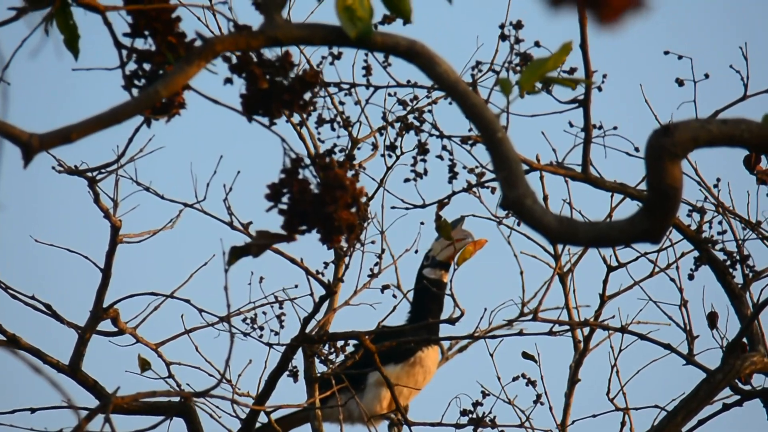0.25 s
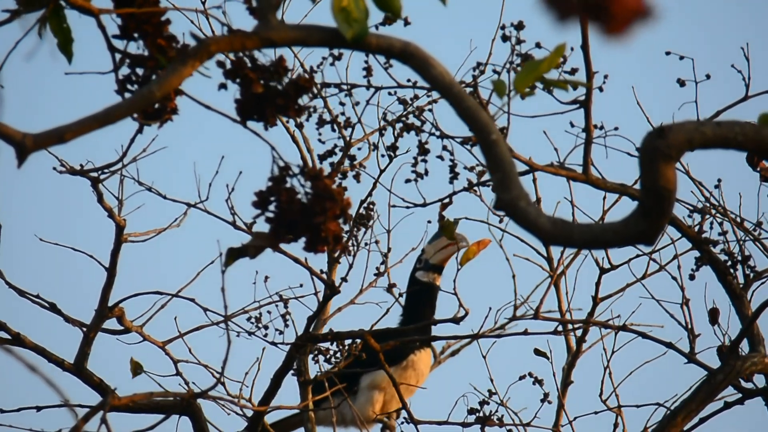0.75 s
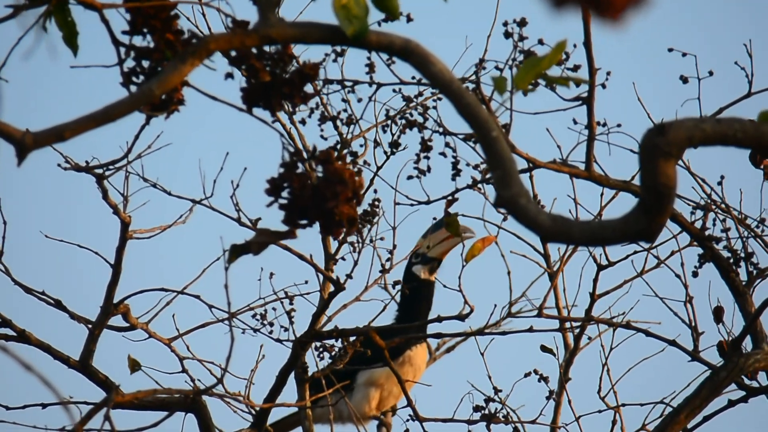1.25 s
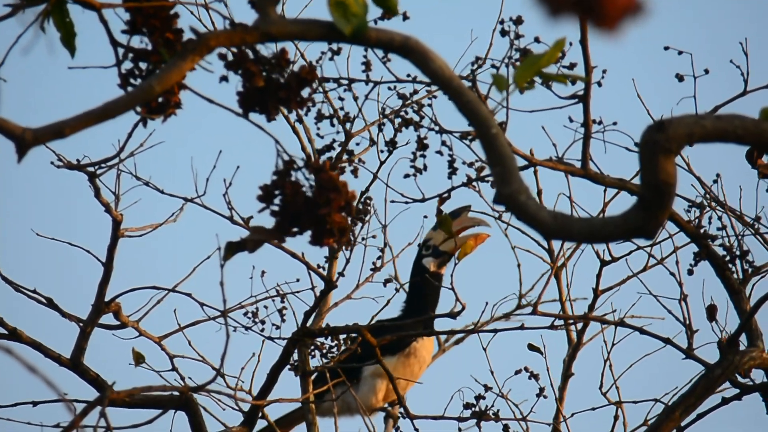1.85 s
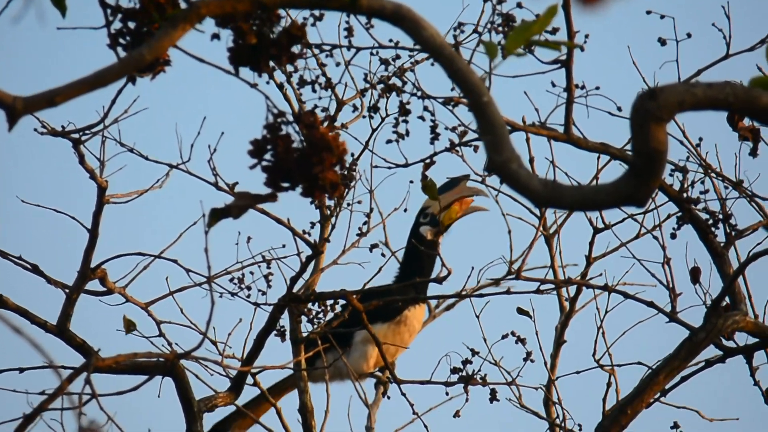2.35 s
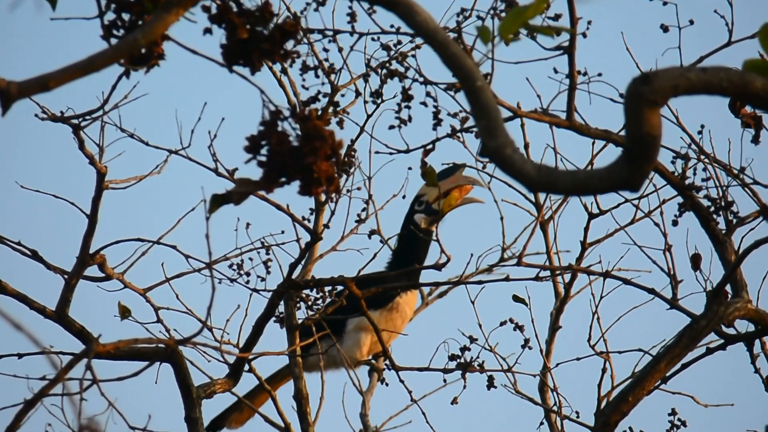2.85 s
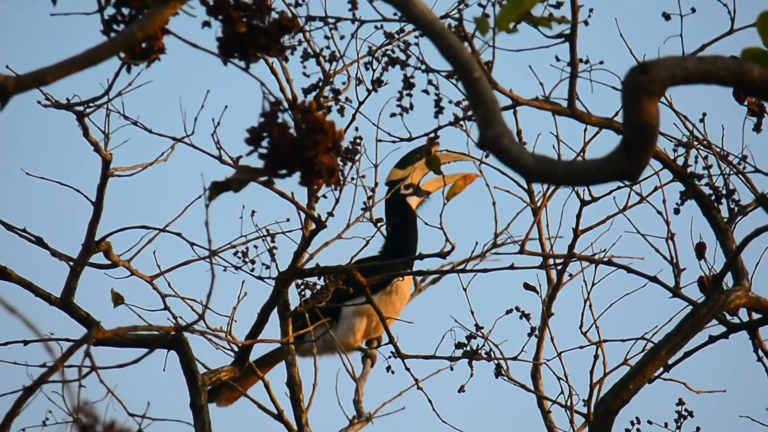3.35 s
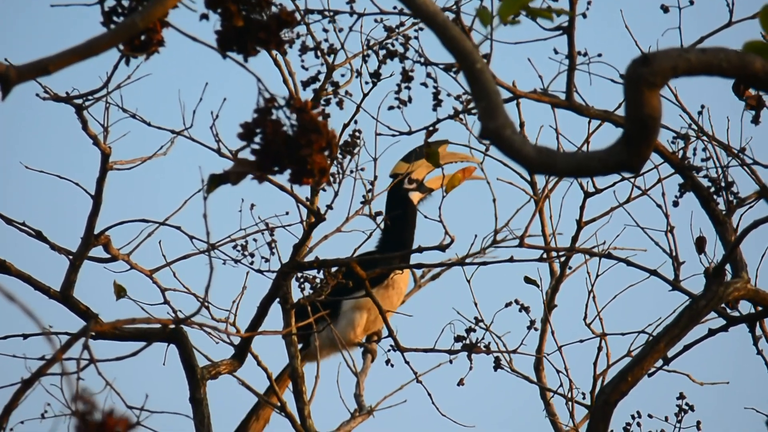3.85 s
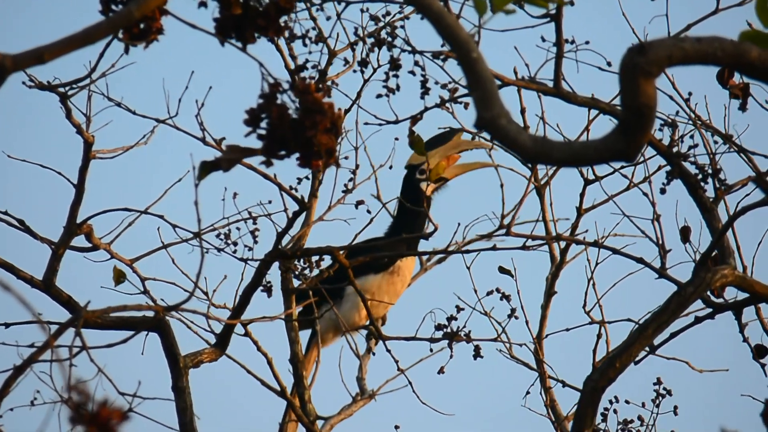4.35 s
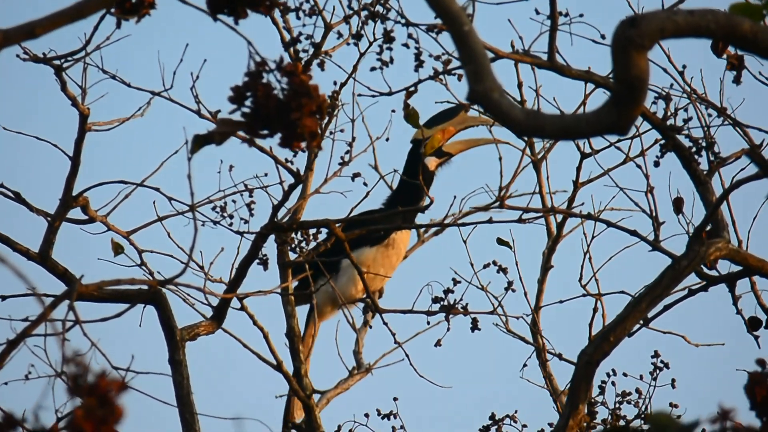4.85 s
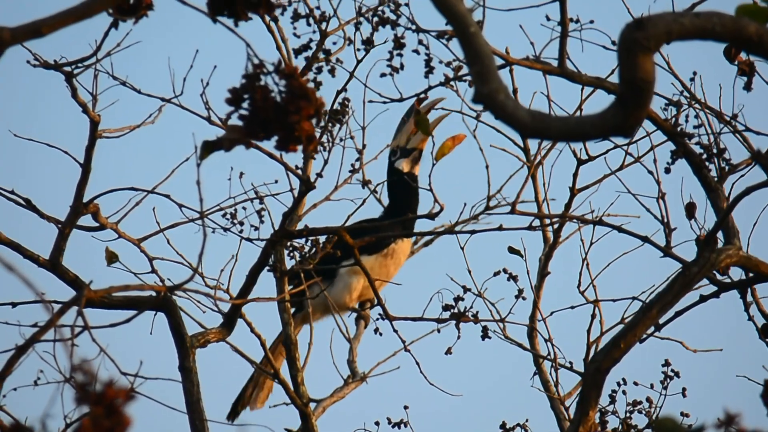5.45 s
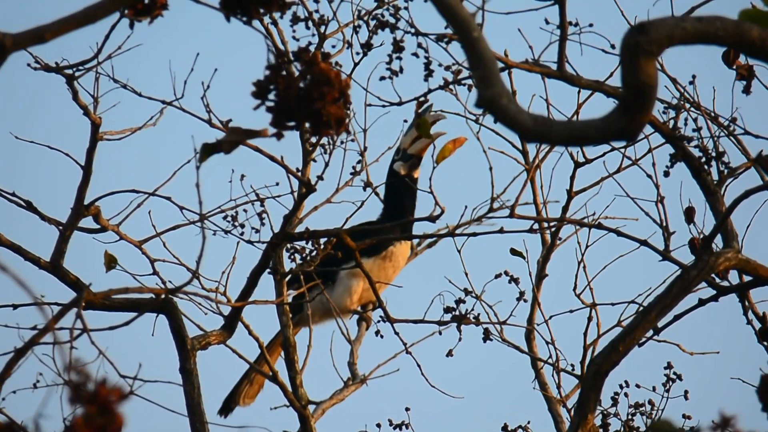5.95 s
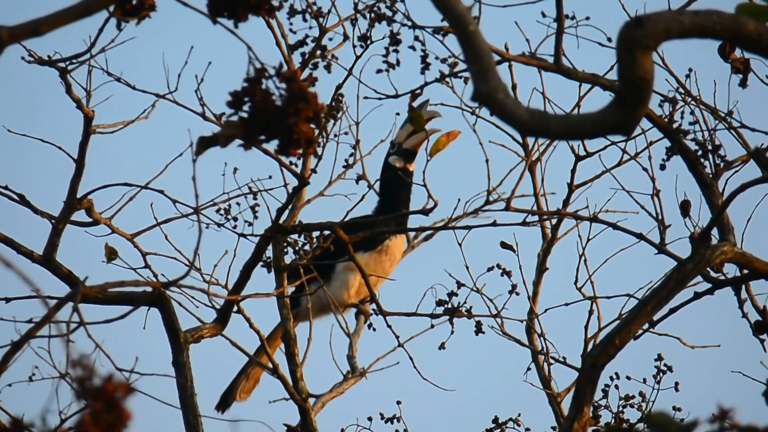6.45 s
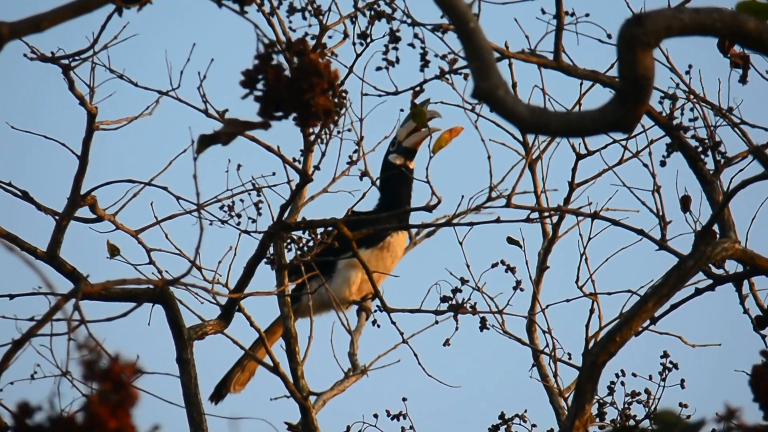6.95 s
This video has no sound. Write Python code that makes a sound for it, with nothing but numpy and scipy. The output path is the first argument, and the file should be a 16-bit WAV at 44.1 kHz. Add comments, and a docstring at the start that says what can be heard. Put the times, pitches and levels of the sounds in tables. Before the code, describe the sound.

A quiet, wide woodland hush with a faint, steady, high insect hiss. From 0 to about 1 second a large bird, nearly straight ahead, gives six soft, hollow clucks about 0.2 seconds apart; leaves rustle very faintly near 0.55. At 1.2 comes a short, weak, low squawk, then from 1.5 to 6.1 ten loud, harsh squeals, roughly one every half second, each about a quarter second long. Each leaps up in pitch, holds a bright, nasal, double-voiced scream with a gritty edge, then drops off. Between squeals, thin, much quieter whistles sound as the bird draws breath. The middle calls are rougher; the last, near 5.9, is broken and cracks upward. Trees add a short, diffuse echo. Soft low wind bumps touch the microphones, slightly stronger on the right. At 6.6 leaves rustle briefly, and the hush continues to about 7 seconds.

```python
"""A large bird in a treetop, nearly straight ahead of a pair of microphones, first clucks softly.
Then comes a run of harsh squeals with a thin whistle on each indrawn breath. Two membranes in its voice box
vibrate at once and mix; throat and hollow bill colour them. Trees echo the calls. A quiet woodland hush, a thin
insect band and soft wind thumps lie beneath; leaves rustle during the clucks and again after the last squeal."""
import sys
import numpy as np
from scipy import signal
from scipy.fft import rfft, irfft, next_fast_len
from scipy.io import wavfile
from scipy.ndimage import uniform_filter1d

SR = 44100
rng = np.random.default_rng(int(sys.argv[2]) if len(sys.argv) > 2 else 0)


def wav_out(sig):
    """Save sig, one row per channel (or a flat mono array), as 16-bit PCM at SR to the path in sys.argv[1]."""
    wavfile.write(sys.argv[1], SR, np.round(np.clip(np.atleast_2d(sig).T, -1, 1) * 32767).astype(np.int16))


def to_linear_factor(level_db):
    """Convert decibel levels (scalar or array-like) to linear amplitude factors."""
    exponent = np.asarray(level_db, float) / 20
    return 10 ** exponent


N = 317520


def colour(x, points):
    """Shape a signal's spectrum by (Hz, dB) points."""
    hz, db = np.transpose(points)
    size = next_fast_len(x.shape[-1])
    bins = np.maximum(np.arange(size // 2 + 1) * SR / size, 1)
    gain = to_linear_factor(np.interp(np.log(bins), np.log(hz), db))
    return irfft(rfft(x, size) * gain, size)[..., :x.shape[-1]]


def level(x, db):
    """Set the rms level."""
    return x * to_linear_factor(db) / np.sqrt(np.mean(x ** 2))


def walk(rate, count):
    """Smooth random wobble of rms 1; a higher rate [Hz] wobbles faster."""
    k = int(SR / rate)
    smooth = uniform_filter1d(uniform_filter1d(rng.standard_normal(count), k), k)
    return level(smooth, 0)


def add(track, start_s, sound):
    """Mix a sound in at a time."""
    i = max(int(start_s * SR), 0)
    track[..., i:i + sound.shape[-1]] += sound[..., :N - i]


def unroll(rows):
    """Curve rows to one value a sample, with a short fade at both ends."""
    s, *columns = np.transpose(rows)
    t = np.arange(s[0], s[-1], 1 / SR)
    fade = np.clip(np.minimum((t - s[0]) / 0.0022, (s[-1] - t) / 0.0091), 0, 1)
    return fade, [np.interp(t, s, c) for c in columns]


def throat(hz, gape_db):
    """Gain of the steep throat resonances for one gape; little bass leaves the bill, a trace the chest."""
    # throat and bill resonances: (centre [Hz], width [Hz], level before the gape's lift [dB])
    resonances = [(1270, 760, -5.5), (1650, 790, -2), (2075, 196, 2.5), (2580, 880, 4), (3090, 270, -2.5),
                  (3900, 1010, -5.5), (4663, 264, 3.5), (5570, 1280, -6.5), (6692, 430, -7.5),
                  (7920, 1500, -17), (9110, 1130, -13), (10070, 1900, -17.5), (12260, 4000, -24.5)]
    # where the lifts in gape_db apply: (frequency [Hz])
    gape_hz = [1300, 2300, 3300, 3900, 4700, 5600, 6600, 7600, 9000, 10500, 13000]
    bill_low_hz, bill_high_hz = 1000, 11440
    chest_hz, chest_width_hz, chest_db = 536, 220, -10.5
    lift_db = np.interp(np.log([row[0] for row in resonances]), np.log(gape_hz), gape_db)
    power = 0
    for (centre, width, db), lift in zip(resonances, lift_db):
        power = power + to_linear_factor(2 * (db + lift)) / (1 + (2 * (hz - centre) / width) ** 2) ** 2
    bill = 1 / (1 + (bill_low_hz / hz) ** 18)
    chest = to_linear_factor(2 * chest_db) / (1 + (2 * (hz - chest_hz) / chest_width_hz) ** 4)
    return np.sqrt(power * (bill + chest) / (1 + (hz / bill_high_hz) ** 16))


def controls(start_s, end_s, climb_db, higher_db, fall_db, hold):
    """A squeal's climb, hold and fall, as the membranes tighten from slack pitch and loosen again.

    Rows of (time [s], low [Hz], high [Hz], level, mixed, higher mixed, brightness [dB], roughness)."""
    rest_hz, climb_s = 501.7, 0.028  # slack pitch; time constant of the climb
    swell_s, swell_db = 0.0048, -25  # the level swells in from this far below the climb
    dip_s, dip_width_s, dip_db = 0.026, 0.0054, -2.5  # the voice falters just after it catches
    climb_mixed_db, climb_higher_db, climb_rough, climb_dull_db = -7.5, -20, 0.426, -21
    fall_low_hz, fall_high_hz, fall_mixed_db, fall_rough, fall_dull_db = 902, 1405, -10, 0.39, -8.5
    fall_start_higher_db, fall_end_higher_db = 6, -8

    top_s, top_hz, top_high_hz, top_db, _, top_bright_db, top_rough = hold[0]
    t = np.arange(0, top_s - start_s - .004, .004)
    part, same = t / (top_s - start_s), np.ones(len(t))
    risen = (1 - np.exp(-t / climb_s)) / (1 - np.exp(-(top_s - start_s) / climb_s))
    low_hz = rest_hz + (top_hz - rest_hz) * risen
    high_hz = low_hz * top_high_hz / top_hz
    db = climb_db + swell_db * np.exp(-t / swell_s) + (top_db - climb_db) * part ** 3.1
    db = db + dip_db * np.exp(-((t - dip_s) / dip_width_s) ** 2)
    bright_db = top_bright_db + climb_dull_db * (1 - risen)
    # roughness moves to its top value mostly just before the top
    rough = climb_rough + (top_rough - climb_rough) * part ** 2.3
    climb = np.c_[start_s + t, low_hz, high_hz, db, climb_mixed_db * same, climb_higher_db * same,
                  bright_db, rough]

    higher = [climb_higher_db] + [higher_db] * (len(hold) - 2) + [fall_start_higher_db]
    held = [(*row[:5], step_db, *row[5:]) for row, step_db in zip(hold, higher)]

    _, last_hz, last_high_hz, last_db, _, last_bright_db, _ = hold[-1]
    fall = (end_s, min(fall_low_hz, last_hz), min(fall_high_hz, last_high_hz), last_db + fall_db,
            fall_mixed_db, fall_end_higher_db, last_bright_db + fall_dull_db, fall_rough)
    return np.vstack([climb, held, fall])


def squeal(rows, gape_db):
    """Every tone is j low + k high membrane cycles; the high membrane is the unsteady one."""
    grid_hz = np.linspace(1, SR / 2, 1024)
    bright_hz = 3190  # brightness balances the sound below and above this
    fade, (low_hz, high_hz, db, mixed_db, higher_db, bright_db, rough) = unroll(rows)
    # fast pitch glides shake the membranes out of step
    rough = rough + np.clip(np.abs(np.gradient(low_hz)) * SR / 90000, 0, .2)
    rough = np.clip(rough, 0, 1)
    n, gain = len(fade), throat(grid_hz, gape_db)
    low = np.cumsum(low_hz * (1 + 0.0262 * rough * walk(670, n))) * 2 * np.pi / SR
    high = np.cumsum(high_hz * (1 + 0.1218 * rough * walk(307, n))) * 2 * np.pi / SR

    bands, powers = np.zeros((2, n)), np.zeros((2, n))  # below and above bright_hz
    for j in range(-2, 11):
        for k in range(-1, 4):
            hz = np.abs(j * low_hz + k * high_hz)
            if j + k < 0 or hz.max() < 200 or hz.max() > .45 * SR:
                continue
            # tones with cycles of the high membrane follow the mixed and higher mixed levels
            mix_db = 0
            if k != 0:
                mix_db = mixed_db + abs(k - 1) ** 0.28 * np.minimum(higher_db, 2) - 1.4 * (k < 0)
            size = to_linear_factor(mix_db - 0.96 * abs(j) - 5.7 * (j < 0)) * np.interp(hz, grid_hz, gain)
            upper = 1 / (1 + (bright_hz / (hz + 1)) ** 12)
            split = np.array([1 - upper, upper])
            bands += split * size * np.cos(j * low + k * high + 0.784 * j * j)
            powers += (split * size) ** 2 / 2

    # turbulent air puffs once a cycle through the same throat
    puffs = rng.standard_normal(n) * (1 + 3.7 * np.cos(low))
    air = colour(puffs, np.c_[grid_hz, 20 * np.log10(gain)])
    air = colour(air, [(1000, -26), (1700, -5)])
    air_upper = colour(air, [(bright_hz * 0.87, -30), (bright_hz * 1.22, 0)])
    airs = np.array([level(air - air_upper, 0), level(air_upper, 0)])
    share = np.clip(np.array([rough, 1.35 * rough + .07]), 0, .9)  # the treble is breathier
    flutter = to_linear_factor(5 * rough * walk(700, n))
    voiced = np.sqrt(1 - share ** 2) * bands / np.sqrt(powers) * flutter + share * airs

    treble = np.clip(to_linear_factor(bright_db), 0, .95)
    balanced = np.sqrt(1 - treble ** 2) * voiced[0] + treble * voiced[1]
    # the membranes catch at once, so the opening jumps up faster than the effort
    catch = 1 + 0.5 * np.exp(-((np.arange(n) / SR - .005) / 0.0097) ** 2)
    return fade * catch * to_linear_factor(db) * balanced


def flare(db, hz):
    """A brief rising chirp: the second partial strikes the bill resonance."""
    t = np.arange(int(0.017 * SR)) / SR
    return to_linear_factor(db) * np.hanning(len(t)) * np.sin(2 * np.pi * hz * t * (1 + 2.6 * t))


def breath(start_s, loud_s, end_s, top_hz, top, first_db, second_db):
    """An indrawn breath as rows of (s, Hz, first dB, second dB): soft at first, a jump, an arch, a fade."""
    rest_hz, jump_s = 770, 0.0147
    soft_arch, jump_share, bend = 0.299, .85, 2.2  # shares of the rise above rest; power of the sag
    soft_db, end_db = -9, -15.5
    kick_db, kick_share = 2.5, 0.1  # extra level at the jump, dying over this share of the loud part
    pure_db, thin_db = -1, -7.5  # change in the overtones while soft, and by the end
    u = np.arange(9) / 8
    rise = 1 - (1 - jump_share) * np.clip(1 - u / top, 0, 1) ** 2
    sag = np.clip((u - top) / (1 - top), 0, 1) ** bend
    s = np.r_[start_s, max(loud_s - jump_s, start_s), loud_s + u * (end_s - loud_s)]
    arch = np.r_[0, soft_arch, rise - sag]
    db = np.r_[soft_db, soft_db, end_db * u ** 3.2 + kick_db * np.exp(-u / kick_share)]
    overtone_db = np.r_[pure_db, pure_db, thin_db * u]
    return np.c_[s, rest_hz + (top_hz - rest_hz) * arch, first_db + db, second_db + db + overtone_db]


def inhale(rows):
    """One membrane whistles nearly clean on the indrawn air."""
    fade, (hz, first_db, second_db) = unroll(rows)
    phase = np.cumsum(hz * (1 + .005 * walk(150, len(hz)))) * 2 * np.pi / SR
    overtones = np.sin(2 * phase) + to_linear_factor(-11) * np.sin(3 * phase)
    tones = to_linear_factor(first_db) * np.sin(phase) + to_linear_factor(second_db) * overtones
    return np.sqrt(2) * fade * tones * to_linear_factor(2.1 * walk(39, len(hz)))


def cluck(db, hz):
    """A short closed-bill note: second (at hz) and third partials of a low pitch that sags."""
    t = np.arange(int(0.028 * SR)) / SR
    phase = np.pi * hz * t * (1 - 0.6 * t)
    return to_linear_factor(db) * np.hanning(len(t)) * (np.sin(2 * phase) + to_linear_factor(-5.5) * np.sin(3 * phase))


def bird():
    """All that the bird utters: squeals with flares, whistled breaths and clucks, from one throat."""
    # squeals: (start [s], end [s], level as the pitch climbs [dB], higher mixed tones [dB],
    # change in level at the end [dB])
    squeals = [(1.201, 1.282, -37, -14, -4), (1.472, 1.732, -27, -5.5, -7),
               (2.015, 2.293, -26, -13.5, -6.5), (2.507, 2.754, -25.5, 1, -4), (2.96, 3.202, -24.5, -9, -5),
               (3.448, 3.74, -31, -9.5, -1.5), (3.954, 4.22, -28.5, -4.5, -4.5),
               (4.468, 4.72, -28, -0.8, -3), (4.926, 5.157, -28, -1, -4), (5.359, 5.609, -26, -0.3, -5),
               (5.878, 6.087, -25.5, -5, -2)]
    # each squeal from the top of its climb to the start of its fall: (time [s], low membrane [Hz],
    # high membrane [Hz], level [dB], mixed tones [dB], brightness [dB], roughness before glides add to it [0-1])
    holds = [
        [(1.21, 470, 778, -37.5, -25, -18, 0.4), (1.225, 528, 764, -34, -36, -8, 0.56),
         (1.24, 517.3, 777, -31, -4, -7, 0.65), (1.26, 490.5, 770, -36, -23, -8, 0.68)],
        [(1.52, 1300, 1877, -25.5, -17, -1.5, 0.04), (1.53, 1203, 1945, -23, 0, -6, 0.4),
         (1.56, 1235, 1995, -20.5, 1, -6, 0.22), (1.63, 1264, 2050, -18, 1.5, -5.5, 0),
         (1.68, 1237, 1981, -21.5, 3, -8, .26), (1.7, 1016, 1676, -26.5, -2, -7.5, 0.4)],
        [(2.058, 1312, 1614, -24, -21, -2, .01), (2.066, 1197, 1635, -22, 1, -7.5, 0.27),
         (2.095, 1281, 1746, -22, -12, -3.5, 0.18), (2.105, 1270, 1938, -18.5, 6, -8.5, .19),
         (2.16, 1262, 2057, -14.5, 4, -6, .05), (2.22, 1274, 2002, -16.5, 7.5, -6, 0.13),
         (2.25, 1206, 1708, -25.5, 0, -3, 0.2)],
        [(2.566, 1278, 2032, -23, -34, -0.5, 0.01), (2.574, 1215, 1956, -20.5, 1, -6.5, 0.4),
         (2.61, 1254, 2085, -21, -4, -4.5, 0.15), (2.65, 1264, 2194, -21, -12, -2.5, 0.19),
         (2.69, 1254, 2090, -21.5, -6.5, -4, 0.22), (2.715, 1200, 1981, -23, 8, -5, 0.32),
         (2.735, 1000, 1690, -31.5, -17, -6, 0.42)],
        [(3.008, 1358, 2142, -24, -34, -2, 0.04), (3.018, 1272, 2137, -21, -3, -6, 0.45),
         (3.06, 1292, 2243, -21.5, -8, -4, 0.27), (3.07, 1298, 1960, -18, 6, -4, 0.12),
         (3.11, 1292, 2054, -16.5, 2, -5.5, .18), (3.145, 1282, 1946, -18.5, 0.5, -5.5, 0.09),
         (3.17, 1244, 1850, -25.5, 1, -3.5, 0.36)],
        [(3.48, 1267, 1603, -26.5, -27, -7.5, 0), (3.49, 1212, 1650, -25.5, -4, -14, 0.45),
         (3.51, 1253, 1828, -28.5, -3, -7, 0.22), (3.545, 1272, 2064, -20, 3.5, -14, 0.17),
         (3.59, 1282, 2141, -21.5, -2, -6, 0.06), (3.665, 1265, 2068, -21.5, 3.5, -11.5, 0.18),
         (3.695, 1224, 1750, -30, -15, -5, 0.4)],
        [(4.005, 1289, 1600, -29.5, -11, -6.5, 0.2), (4.015, 1277, 1600, -25.5, -9, -11, 0.34),
         (4.05, 1232, 1669, -24, -4, -10, .32), (4.082, 1279, 1750, -23, -9, -9, .27),
         (4.092, 1286, 1949, -21.5, 2.5, -10, 0.03), (4.16, 1286, 1910, -21.5, 6, -10, 0.16),
         (4.185, 1244, 1804, -28.5, -6, -5.5, 0.34)],
        [(4.522, 1266, 1575, -30, -12, -3.5, .12), (4.53, 1240, 1582, -24.5, -4, -7, 0.54),
         (4.56, 1214, 1602, -25.5, -5, -5.5, 0.43), (4.6, 1216, 1625, -24.5, -3, -5, 0.19),
         (4.65, 1203, 1635, -23.5, -6, -6, 0.4), (4.68, 1165, 1522, -29, -6, -5, 0.42)],
        [(4.985, 1216, 1570, -27.5, -29, -6, 0.24), (5.033, 1299, 1547, -22.5, -23, -12.5, 0.17),
         (5.04, 1206, 1572, -25, 2, -6.5, 0.53), (5.07, 1212, 1606, -24, -4.5, -7.5, 0.31),
         (5.1, 1198, 1614, -25, 5, -4, 0.08), (5.115, 1280, 1578, -28, -4, -5.5, 0.15),
         (5.135, 1059, 1460, -27.5, -9, -9.5, 0.67)],
        [(5.407, 1320, 1601, -26.5, -4, -3, 0.25), (5.414, 1200, 1615, -22.5, -5, -10.5, 0.38),
         (5.45, 1229, 1665, -21.5, -4.5, -5.5, 0.16), (5.51, 1256, 1708, -19, -7.5, -3.5, 0.06),
         (5.555, 1243, 1709, -20, -3.5, -7, 0.08), (5.575, 1190, 1565, -23.5, -3, -4.5, 0.3),
         (5.595, 1141, 1500, -28, -10, -11, .5)],
        [(5.938, 1050, 1606, -22.5, -8, -3.5, 0.7), (5.945, 1108, 1650, -26.5, -26, -1, 0),
         (5.984, 1096, 1631, -28.5, -23, -1.5, 0), (5.99, 1041, 1606, -25.5, -19, -2.5, 0.33),
         (6.018, 1095, 1660, -25, 16, -11, 0.41), (6.026, 1411, 2084, -21, -1, -15, 0.54),
         (6.045, 1322, 1887, -31, -3, 0, 0.03), (6.07, 1045, 1540, -32.5, -25, -14, 0.2)],
    ]
    # posture in each squeal: (turn to the microphones [dB], gape [dB],
    # ring of the hollow casque on the bill near 9 kHz [dB])
    postures = [(10, -2, 11), (10, 5, 9), (3.5, 1, -1), (-0.6, -3, -5), (5.5, 3.5, -2.5), (0.5, 6.5, 6.5),
                (-7, 3.5, 3), (-8.5, -1, 3.5), (-13, -3.5, 5), (0.5, 9.5, 9), (5, 7.5, -6)]
    # lift of the throat at each gape frequency for a turn of the head: (lift [dB per dB])
    turn_lift = [0.0074, -0.15, -0.25, 0.15, 0.086, 0.65, 1.47, -0.018, -0.014, 1.32, .01]
    # the same for a wider gape: (lift [dB per dB])
    gape_lift = [-0.31, 0.15, -0.8, 1, -0.028, -0.62, -0.28, 0.8, -0.046, 0.24, -0.21]
    # the same for the casque: (lift [dB per dB])
    casque_lift = [.01, .01, .01, .01, .01, .01, .01, 0.19, 1, 0.13, .01]
    # the first, short squeal leaves a half-shut bill: (extra lift at each gape frequency [dB])
    half_shut_db = [18, -4.5, 14.5, -30, 5.5, 6.5, 9, -20, 4, .1, -6]
    # flares: (time [s], peak [dB], pitch at the start [Hz])
    flares = [(1.5156, -22, 2690), (2.05, -18, 2540), (2.5639, -19, 2560), (3.001, -15, 2564),
              (3.4767, -32, 2580), (4.0032, -20, 2544), (4.518, -18, 2586), (5.032, -14, 2600),
              (5.4025, -15.5, 2580)]
    # indrawn breaths: (start [s], turns loud [s], end [s], top pitch [Hz], share of the loud part before
    # the top [0-1], first partial [dB], second partial [dB]), levels before the breath's own shape
    inhales = [(1.31, 1.326, 1.51, 812, 0.32, -56.5, -68), (1.759, 1.815, 2.0, 957, 0.48, -46, -43.5),
               (2.321, 2.357, 2.49, 824, 0.12, -57, -56), (2.78, 2.815, 2.95, 878, .3, -49, -75),
               (3.22, 3.257, 3.44, 1090, 0.38, -45, -43.5), (3.815, 3.841, 3.93, 915, 0.069, -49.5, -46.5),
               (4.234, 4.278, 4.45, 975, .08, -47, -43), (4.773, 4.797, 4.92, 840, .1, -58, -55.5),
               (5.19, 5.257, 5.36, 895, .05, -50, -54), (5.639, 5.684, 5.86, 948, 0.075, -47.5, -41.5)]
    # clucks: (time [s], level of the second partial [dB], its pitch at the start [Hz])
    clucks = [(0.015, -48, 950), (0.22, -54, 944), (0.422, -50.5, 960), (0.627, -56.5, 950),
              (0.824, -54, 960), (1.021, -50.5, 956)]

    out = np.zeros(N)
    lifts_db = np.array(postures) @ np.array([turn_lift, gape_lift, casque_lift])
    lifts_db[0] += half_shut_db
    for row, hold, lift_db in zip(squeals, holds, lifts_db):
        add(out, row[0], squeal(controls(*row, hold), lift_db))
    for s, db, hz in flares:
        add(out, s - .002, flare(db, hz))
    for row in inhales:
        add(out, row[0], inhale(breath(*row)))
    for s, db, hz in clucks:
        add(out, s - .008, cluck(db, hz))
    return out


def trees(x):
    """Scattered echoes from trunks and ground, noise bands that each die at their own rate."""
    # echo decay: (band centre [Hz], time to fall by 60 dB [s])
    decay = [(1000, 0.42), (2500, 0.47), (5000, 0.61), (10000, 0.23)]
    echo_db, likeness = -19.5, 0.97  # likeness of the two sides before the side is coloured
    t, tail = np.arange(SR) / SR, 0
    for hz, t60 in decay:
        band = colour(rng.standard_normal((2, SR)), [(hz / 22, -20), (hz, 0), (hz * 18, -20)])
        tail = tail + level(band, 0) * to_linear_factor(-60 * t / t60)
    tail = tail * np.clip((t - .005) / 0.037, 0, 1)  # the nearest trunks stand some way off
    mid, side = tail / np.sqrt(np.mean(np.sum(tail ** 2, axis=1)))
    side = colour(side, [(1000, -12), (4000, 7), (9000, 14.5)])  # high echoes come from all round
    spread = np.sqrt((1 - likeness) / 2) * side * np.array([[1], [-1]])
    pair = np.sqrt((1 + likeness) / 2) * mid + spread
    return to_linear_factor(echo_db) * signal.fftconvolve(x[None], pair, axes=1)[:, :N]


def hush():
    """Far woodland hush: shaped noise, wide at the sides, that swells slowly."""
    # spectrum of the hush: (frequency [Hz], relative density [dB per Hz])
    spectrum = [(24, -53), (40, -7.5), (207, -6), (577, -4), (704, -1.5), (778, -6.5), (859, -5.5),
                (1350, -5), (2160, -9.5), (6480, -18.5), (15500, -33.5)]
    # width of the hush: (frequency [Hz], side minus mid [dB])
    width = [(30, -7), (70, -7), (125, -12), (300, -5.5), (1000, -2.5), (4000, -2), (12000, -2)]
    mid, side = colour(rng.standard_normal((2, N)), spectrum)
    pair = mid + colour(side, width) * np.array([[1], [-1]])
    pair = level(pair, -56.5) * to_linear_factor(.5 * walk(0.17, N))
    # wind leans on the right microphone
    lean = colour(pair.mean(axis=0), [(70, -23), (160, -40)])
    return pair + lean * np.array([[-1], [1]])


def insects():
    """A thin steady band of high noise."""
    centre_hz, width_hz = 6440, 590
    edges = [(centre_hz - width_hz, -25), (centre_hz, 0), (centre_hz + width_hz, -25)]
    return level(colour(rng.standard_normal((2, N)), edges), -75)


def leaves():
    """Two brief leaf rustles: bright noise under smooth humps of level."""
    # rustles: (time of the peak [s], half length [s], level at the peak [dB])
    rustles = [(0.555, 0.087, -64.5), (6.596, 0.085, -57.5)]
    spectrum = [(4000, -14), (5500, 2), (7000, -3), (9000, -2.5), (14500, -15)]
    noise = level(colour(rng.standard_normal((2, N)), spectrum), 0)
    time = np.arange(N) / SR
    return noise * sum(to_linear_factor(db) * np.exp(-((time - s) / half) ** 2) for s, half, db in rustles)


def wind_thumps():
    """Soft wind thumps on the microphones: short low pulses, stronger on the right."""
    # thumps: (time [s], peak midway between the two sides [dB], pitch [Hz])
    thumps = [(0.969, -56, 61.9), (3.48, -62, 188), (4.929, -68, 78.4), (5.599, -51, 79),
              (5.929, -52, 53.4)]
    out = np.zeros((2, N))
    t = np.arange(int(0.022 * SR)) / SR
    for s, db, hz in thumps:
        sides = to_linear_factor(db + np.array([[-2], [2]]))
        add(out, s - .01, sides * np.hanning(len(t)) * np.sin(2 * np.pi * hz * t))
    return out


def woodland():
    """The background round the bird: air, insects, leaves and wind."""
    return hush() + insects() + leaves() + wind_thumps()


def scene():
    """The bird nearly straight ahead, its echoes and the woodland."""
    voice = bird()
    # the right microphone hears the bird 8.4 microseconds sooner and slightly louder
    lead = np.gradient(voice) * 8.4e-6 * SR / 2
    direct = voice * to_linear_factor(np.array([[-.15], [.15]])) - lead * np.array([[1], [-1]])
    return direct + trees(voice) + woodland()


def low_pass(x):
    """Removes everything above the highest recorded frequency."""
    return signal.sosfilt(signal.butter(12, 15670, fs=SR, output="sos"), x)


def record(dry):
    """The scene as the pair of microphones delivers it."""
    return low_pass(dry)


dry = scene()
out = record(dry)
wav_out(out)
```